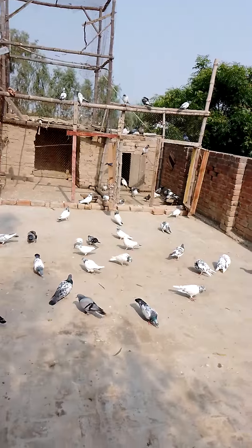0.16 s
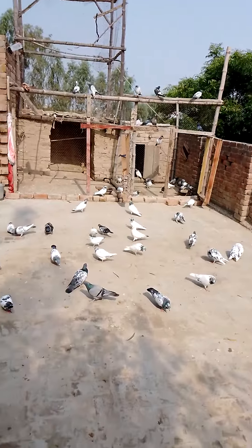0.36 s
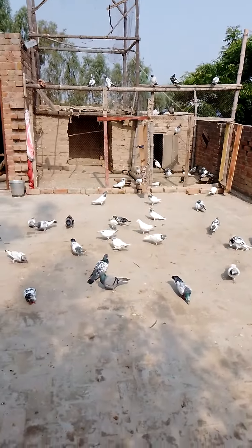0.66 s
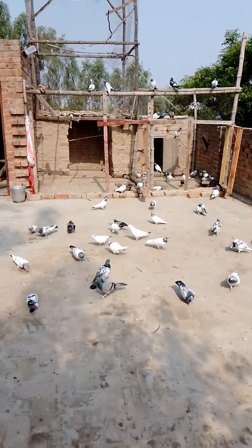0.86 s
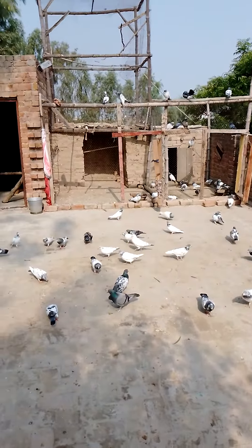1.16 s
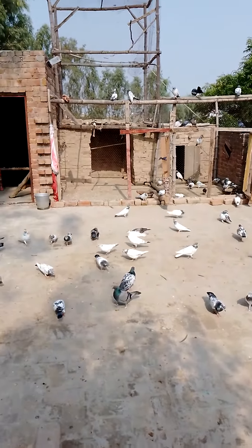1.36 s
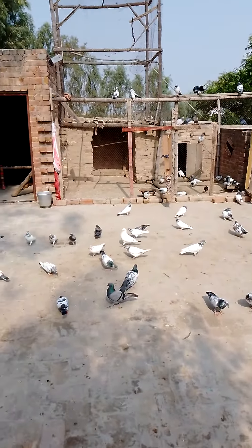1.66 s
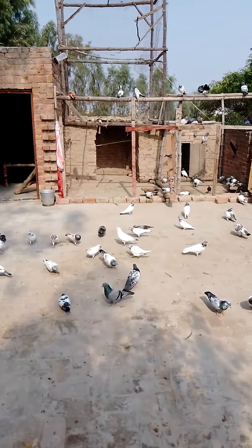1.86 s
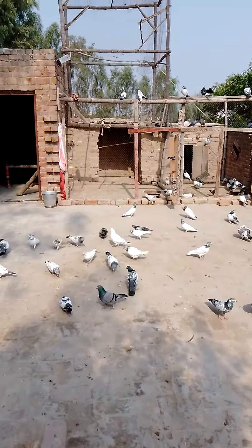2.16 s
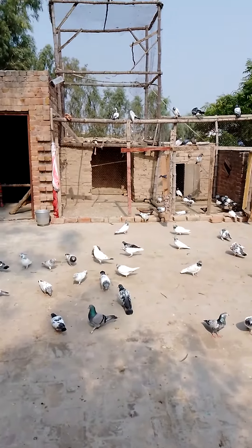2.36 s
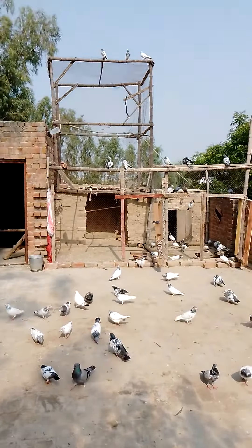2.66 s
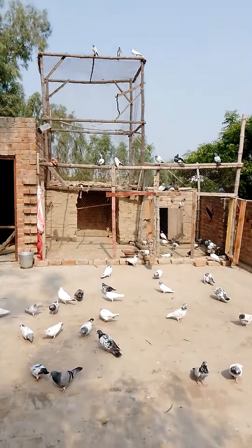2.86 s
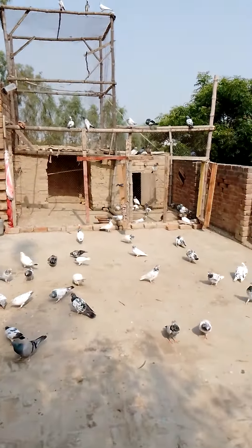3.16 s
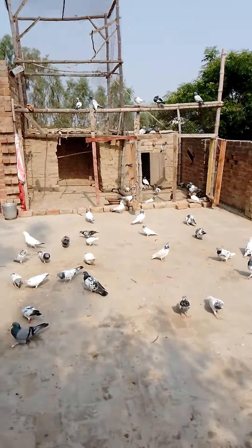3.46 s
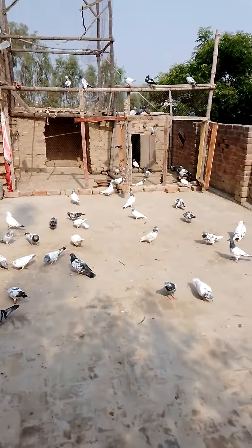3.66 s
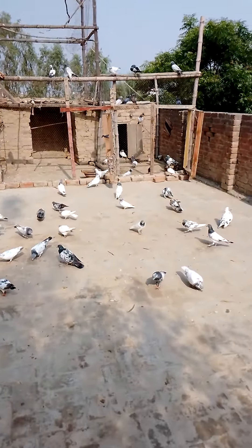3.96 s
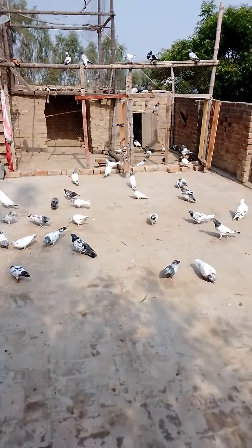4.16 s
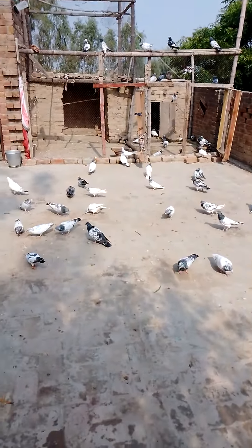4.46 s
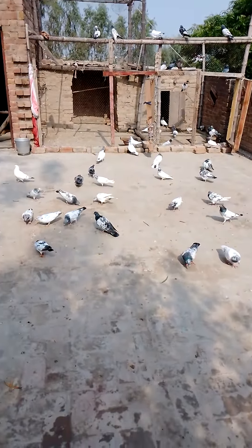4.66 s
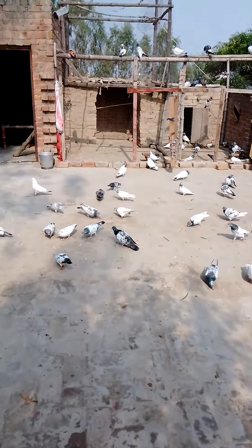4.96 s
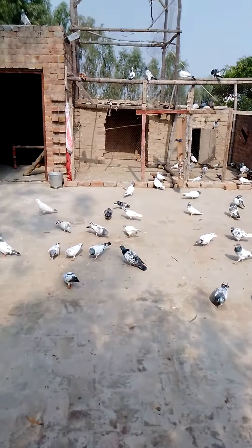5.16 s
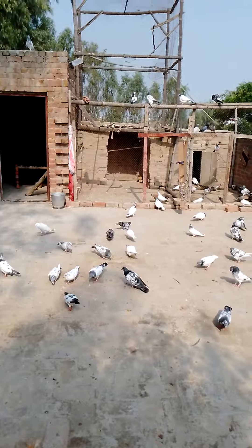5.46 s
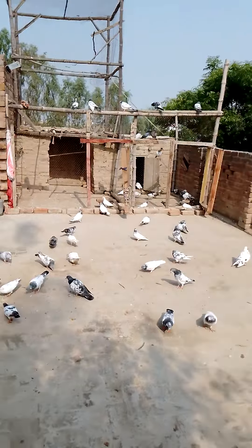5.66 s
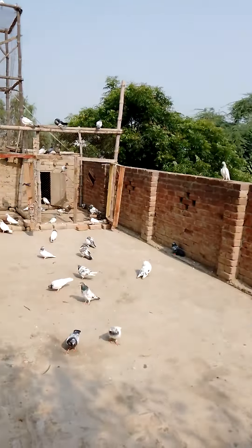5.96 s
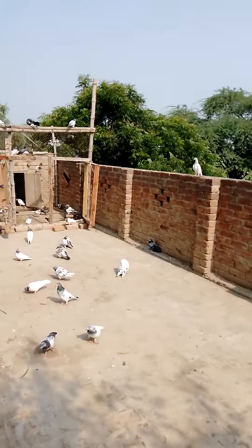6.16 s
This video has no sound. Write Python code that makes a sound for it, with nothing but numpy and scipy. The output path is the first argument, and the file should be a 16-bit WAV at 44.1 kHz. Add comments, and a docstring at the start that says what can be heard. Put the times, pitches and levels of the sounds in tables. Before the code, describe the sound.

Pigeons coo and roll in throaty, throbbing voices in a brick-walled yard, with early wing claps and hoarse crow caws at two and five seconds.

```python
"""A flock of pigeons on an open, brick-walled rooftop, over a faint outdoor rumble.
From the start pigeons coo, throbbing sines with gaps, amid gliding tones: single moans, and faint upper tones
that sound along with coos and a far caw. Noise bursts clap one bird's wings.
Crows in the trees soon caw through two throat resonances, and a small bird whistles short pips.
From two seconds a near crow caws, and caws again at five: harmonics broken by a lower tone.
Noise scuffs the floor from three seconds on, and the coos and gliding tones last to the end."""
import sys
import numpy as np
from scipy import signal
from scipy.fft import rfft, irfft, next_fast_len
from scipy.io import wavfile
from scipy.ndimage import uniform_filter1d, map_coordinates

SR = 44100
rng = np.random.default_rng(int(sys.argv[2]) if len(sys.argv) > 2 else 0)


def materialize(psi):
    """Save the field psi as 16-bit PCM at rate SR to the path in sys.argv[1].

    A 1-D psi becomes a single channel; in a 2-D psi each row is a channel.
    """
    bounded = np.clip(np.atleast_2d(psi).T, -1, 1)
    quanta = np.round(bounded * 32767).astype(np.int16)
    wavfile.write(sys.argv[1], SR, quanta)


N = 277830
T = np.arange(N) / SR


def from_db(db):
    """Decibels to gain."""
    return 10 ** (np.asarray(db) / 20)


def rms_one(x):
    """Scale to unit power."""
    return x / np.sqrt(np.mean(x ** 2) + 1e-20)


def even(x, size=1500):
    """Hold the short-term power at 1."""
    return x / np.sqrt(np.abs(uniform_filter1d(x * x, size=size)) + 1e-6)


def curve(rows, axis=1, t=T):
    """One column of a table, joined by straight lines in time."""
    rows = np.array(rows)
    return np.interp(t, rows[:, 0], rows[:, axis])


def drift(rate):
    """Smooth random curve of spread 1 that changes about rate times a second."""
    knots = rng.standard_normal(8192)
    return rms_one(map_coordinates(knots, [T * rate], order=2, mode="wrap"))


def turn(hz):
    """Running phase of a frequency curve."""
    return 2 * np.pi * np.cumsum(hz) / SR


def band(x, low_hz, high_hz, order=2):
    """Butterworth band-pass."""
    sos = signal.butter(order, [low_hz, high_hz], "band", fs=SR, output="sos")
    return signal.sosfilt(sos, x + 1e-18)


def gain_at(points, hz):
    """Gain of a (Hz, dB) spectrum on a log-frequency axis."""
    points = np.array(points)
    return from_db(np.interp(np.log(hz + 1), np.log(points[:, 0]), points[:, 1]))


def coloured(x, colour):
    """Pass a sound through a (Hz, dB) spectrum."""
    size = next_fast_len(N)
    hz = np.arange(size // 2 + 1) * SR / size
    return irfft(rfft(x, size) * gain_at(colour, hz), size)[:N]


def noise(colour):
    """Unit noise with the given spectrum."""
    return rms_one(coloured(rng.standard_normal(N), colour))


def blip(at, width):
    """A brief bell-shaped rise and fall."""
    return np.exp(-.5 * np.minimum(((T - at) / width) ** 2, 100))


def bursts(rows):
    """Envelope of soft contacts that build within a millisecond and die away exponentially."""
    out = np.zeros(N)
    for at, level_db, decay in rows:
        on = (T >= at) & (T < at + 10 * decay)
        age = T[on] - at
        rise = np.sin(np.pi / 2 * np.minimum(age / .0007, 1)) ** 2
        out[on] += from_db(level_db) * rise * np.exp(-age / decay)
    return out


def swell(start, loudest, let_go, power, sag_db_per_s, release_db_per_s):
    """Effort that grows towards 1, sags after its loudest time and dies away once let go."""
    rise = np.clip((T - start) / (loudest - start), 0, 1) ** power
    sag_db = sag_db_per_s * np.maximum(T - loudest, 0)
    release_db = release_db_per_s * np.maximum(T - let_go, 0)
    return rise * from_db(-sag_db - release_db)


def outdoor_air():
    """A steady, faint outdoor rumble: noise weighted to the lows."""
    # Spectrum of the open air. Each row: frequency in Hz, relative level in dB.
    air_colour = [(20, -17), (48, -16), (65, -1.5), (85, -10.5), (130, -12), (165, -23), (260, -9.5),
                  (450, -9.5), (600, -17.5), (950, -22), (1800, -27), (2800, -21.5), (5900, -37),
                  (15500, -43)]
    return from_db(-67) * noise(air_colour)


def coo_effort(start, loudest, let_go):
    """The push behind one coo: it swells, sags slowly, then dies away."""
    return swell(start, loudest, let_go, power=1.35, sag_db_per_s=22, release_db_per_s=127)


def pigeon(pitch, rough, throb_hz, bend, jitter, overtone_db):
    """A near-sine from the closed beak; an uneven flutter of the syrinx cuts brief gaps in it and bends its pitch."""
    flutter = turn(throb_hz * np.exp(.27 * drift(60)))
    phase = turn(pitch * (1 + rough * (bend * np.sin(flutter) + jitter * drift(170))))
    gaps = ((1 - np.cos(flutter)) / 2) ** 2
    pulses = (1 - 1.14 * rough * gaps) * from_db(3.9 * rough * drift(80))
    return even(pulses * (np.sin(phase) + from_db(overtone_db) * np.sin(2 * phase)))


def back_pigeons():
    """Two higher voices overlap, rising in pitch as they push harder."""
    # Coos at the back. Each row: start, loudest and let-go times in seconds, level in dB.
    back_rows = [(-.1, 0.0, 0.034, -51.5), (0.08, 0.153, 0.37, -46.5), (.79, 0.866, .92, -61),
                 (0.956, 1.412, 1.5, -43.5), (1.551, 1.713, 1.73, -47), (1.972, 2.07, 1.84, -71.5),
                 (2.237, 2.379, 3.1, -52), (2.445, 2.86, 3.28, -45.5), (3.83, 3.88, 4.03, -67.5),
                 (4.03, 4.09, 4.37, -64.5), (4.4, 4.573, 4.87, -49.5), (4.981, 5.134, 5.3, -57.5),
                 (5.243, 5.761, 6.1, -45)]
    power = sum((from_db(level_db) * coo_effort(*times)) ** 2 for *times, level_db in back_rows)
    level = np.sqrt(power)
    pitch = 462.4 + 24.9 * level / level.max()   # Hz
    voices = np.zeros(N)
    for bird in range(2):
        own_pitch = pitch * np.exp(.07 * drift(12))
        voices += pigeon(own_pitch, .75, throb_hz=59.04, bend=0.063, jitter=0.0612, overtone_db=-26)
    return from_db(1.7 * drift(25)) * level * even(band(voices, 369, 598, order=3))


def gliding_tones():
    """Single moans, and faint upper tones along with coos and a far caw, swell, glide and fade; rough ones tremble."""
    # Gliding tones. Each row: start and length in seconds, first and last pitch in Hz, level in dB,
    # roughness 0-1, share of the tone spent swelling (held within .02-.98).
    glide_rows = [(-.05, 0.14, 302, 286.4, -43, 0.18, .4), (.088, 0.1, 579, 505, -47, 0.1, .2),
                  (.1, .14, 479, 388.6, -45, 0.36, 0.33), (0.217, 0.17, 650, 595.5, -52.5, 0.4, .4),
                  (1.451, 0.21, 655, 605.6, -55, 0.4, 0.49), (1.641, 0.065, 601, 530, -44.5, 0.01, .6),
                  (1.7, 0.076, 467, 501, -41, 0.19, 0.21), (2.0, .14, 468, 496, -68.5, .2, .6),
                  (3.431, 0.085, 336.5, 294, -53, 0.54, 0.086), (3.55, .11, 410, 390, -47, 0.47, 0.078),
                  (3.703, 0.061, 408, 275, -47.5, 0.4, 0.092), (3.76, 0.094, 318, 267, -55, 0.3, 0.15),
                  (4.221, 0.24, 433.4, 456.4, -53.5, .25, 0.67), (4.39, 0.072, 478.6, 496, -43.5, 0, 0.93),
                  (4.47, 0.087, 494, 482, -44, .15, 0.21), (4.558, 0.065, 424.7, 372, -40.5, 0.19, 0.18),
                  (4.568, 0.28, 321.8, 239.5, -47, 0.1, 0.097), (4.569, 0.06, 615, 598, -55.5, 0, .45),
                  (4.66, 0.12, 575, 472, -45, 0.18, 0.94), (4.786, 0.1012, 458, 329, -43.5, 0.35, 0.47),
                  (4.851, .11, 564, 617, -50.5, .14, 0.34), (5.062, .13, 233, 254, -54, 0.44, 0.19),
                  (5.616, .22, 690, 765, -60, .6, 0.56), (5.89, .15, 790, 745, -58.5, .12, 0.29),
                  (5.802, .2, 469, 371, -42, .25, .2), (5.879, 0.16, 658, 633, -52, 0.15, .45),
                  (5.99, 0.17, 451.7, 488.6, -46.5, 0.15, 0.57), (6.13, 0.11, 473, 477, -41, 0.03, 0.55),
                  (6.235, 0.11, 493, 514, -45.5, 0, 0.37)]
    out, tremor = np.zeros(N), drift(140)
    flutter = np.sin(turn(62 * np.exp(0.47 * drift(60))))
    for start, length, first_hz, last_hz, level_db, rough, swelling in glide_rows:
        on = (T > start) & (T < start + length)
        age = (T[on] - start) / length
        glide = first_hz + (last_hz - first_hz) * age
        phase = turn(glide * (1 + 0.12 * rough * tremor[on]))
        shape = np.interp(age, [0, np.clip(swelling, .02, .98), 1], [0, 1, 0]) ** 0.74
        shape *= 1 + rough * flutter[on]
        tone = np.sin(phase) + rough * from_db(-17) * np.sin(2 * phase)
        out[on] += np.sqrt(2) * from_db(level_db) * shape * tone
    return out


def wings():
    """Wing tips crack together; between the claps the feathers rustle and sweep through the air."""
    # Wing claps and feather flicks. Each row: time in seconds, envelope peak in dB, decay in seconds.
    clap_rows = [(.036, -51.5, 0.021), (.092, -31, 0.0066), (0.111, -38.5, 0.011), (0.212, -43.5, 0.0085),
                 (0.232, -44.5, 0.011), (.334, -41.5, 0.0089), (0.359, -47.5, 0.0068), (.462, -53, 0.039),
                 (0.546, -49, 0.003), (.751, -45.5, 0.016), (0.8477, -38.5, 0.0037), (0.862, -39, 0.0057),
                 (0.9246, -42, 0.0032), (0.9411, -54.5, 0.0033), (1.004, -47.5, 0.0026)]
    # Spells of feather rustle. Each row: start, loudest and let-go times in seconds, level in dB.
    rustle_rows = [(-.2, .1, 0.4, -58.5), (0.432, .56, 0.62, -57), (.76, .87, 1.04, -62),
                   (1.148, 1.35, 1.42, -71)]
    # One hard sweep of the wings: start, loudest and let-go times in seconds.
    sweep_times = (0.746, 0.795, 0.807)
    # Spectra of clap, rustle and sweep. Each row: frequency in Hz, relative level in dB.
    clap_colour = [(500, -37), (900, -24), (1350, -1.5), (2100, -14), (2800, -5), (3600, 6.5), (4250, 3),
                   (5100, -17), (7000, -26.5), (9000, -40), (15000, -37)]
    rustle_colour = [(590, -28), (1000, -8), (1090, -15.5), (1530, 1), (1750, -12.5), (2470, -12.5),
                     (2770, -5), (3710, 3), (4240, -6), (5860, -31.5), (12000, -40.5), (15600, -84),
                     (22000, -120)]
    sweep_colour = [(410, -64), (700, -24.5), (1250, -30.5), (1530, -2), (1980, -7.5), (2520, -1.5),
                    (3390, 1), (5170, -19), (5960, -19), (7130, -24.5), (8110, -42), (15000, -43.5)]
    barbs = from_db(2.5 * drift(500))   # feathers catch on each other
    flight = sum(from_db(level_db) * swell(*times, power=0.88, sag_db_per_s=3, release_db_per_s=109)
                 for *times, level_db in rustle_rows)
    rustle = from_db(1.2 * drift(54.1)) * flight * noise(rustle_colour)
    push = swell(*sweep_times, power=1.1, sag_db_per_s=30, release_db_per_s=604)
    sweep = from_db(-38) * push * noise(sweep_colour)
    return bursts(clap_rows) * noise(clap_colour) + barbs * (rustle + sweep)


def near_pigeons():
    """Rolling coos and grunts, higher and clearer with effort; the inflated crop passes only a low band."""
    # Rolling coos. Each row: start, loudest and let-go times in seconds, level in dB,
    # pitch at full effort in Hz, roughness 0-1 before effort clears it.
    coo_rows = [(0.071, 0.21, 0.37, -35, 338.7, 0.76), (0.999, 1.5, 1.66, -34, 355.7, 0.76),
                (2.278, 2.653, 2.68, -35, 353.5, 0.68), (2.691, 2.831, 3.17, -38, 382, 0.92),
                (3.144, 3.252, 3.25, -47, 300, 0.92), (3.98, 4.102, 4.15, -61, 310, .85),
                (4.177, 4.308, 4.29, -50, 298, 0.9), (4.419, 4.628, 4.66, -43.5, 330, 0.37),
                (4.76, 4.93, 5.05, -49, 321, 0.74), (5.151, 5.507, 5.54, -42.5, 317.2, 0.95),
                (5.542, 5.678, 5.79, -34, 350.7, 0.86), (5.79, 5.87, 5.92, -35, 345, 0.87)]
    # Short grunts in the same voice. Each row: time in seconds, level in dB, pitch in Hz.
    grunt_rows = [(0.111, -43, 355.2), (.84, -59.5, 300), (1.147, -46, 339.8), (1.808, -47, 328),
                  (1.867, -54, 322.6), (2.458, -43.5, 338.3), (3.15, -42, 387), (5.059, -54.5, 402),
                  (5.145, -44.5, 359), (5.2, -55, 398.8), (5.305, -46.5, 285), (6.02, -42.5, 324.2),
                  (6.197, -51, 396)]
    # Times in seconds when the voice catches briefly.
    catch_times = [.145, .3, 1.19, 1.24, 1.31, 1.782, 2.548, 4.695, 5.04, 5.375, 5.47, 5.565, 5.808]
    pitch_drop, clearing = .13, .2   # share of pitch lost without effort, of roughness lost at full effort
    notes = [(from_db(level_db) * blip(at, .015), hz, 0.819) for at, level_db, hz in grunt_rows]
    for start, loudest, let_go, level_db, hz, roughness in coo_rows:
        effort = coo_effort(start, loudest, let_go)
        note_hz = hz * (1 - pitch_drop * (1 - effort))
        note_rough = roughness * (1 - clearing * effort ** 4)
        notes.append((from_db(level_db) * effort, note_hz, note_rough))
    power = sum(gain ** 2 for gain, _, _ in notes)
    # the loudest note leads
    pitch = sum(gain ** 2 * hz for gain, hz, _ in notes) / power
    rough = np.clip(sum(gain ** 2 * roughness for gain, _, roughness in notes) / power, 0, 1)
    voice = pigeon(pitch, rough, throb_hz=62.95, bend=0.1, jitter=0.097, overtone_db=-23.5)
    voice = even(band(voice, 236.7, 644, order=6)) * from_db(1.3 * drift(32))
    catch_db = -9 * sum(blip(at, 0.011) for at in catch_times)
    return voice * np.sqrt(power) * from_db(catch_db)


def far_crows():
    """Distance leaves a faint fundamental and two throat resonances of each hoarse, pulsing caw."""
    # Crows in the trees. Each row: start and length in seconds, first and last pitch in Hz, rasps per second,
    # level in dB, share of the call spent swelling, upper throat resonance in Hz, its dB over the lower one.
    far_rows = [(0.3, 0.65, 790.6, 798, 63, -59.5, 0.74, 3630, -13),
                (0.554, 0.23, 788, 795.7, 97, -56.5, 0.22, 2662, 7),
                (1.111, 0.35, 501, 595, 91, -55, 0.74, 3420, -20),
                (1.634, 0.26, 564.4, 585, 78, -60, 0.32, 2400, 6.5),
                (4.623, 0.19, 614, 580, 75, -66, 0.045, 2697, 12),
                (4.696, 0.35, 522, 570, 66, -61, 0.49, 2720, -17.5),
                (5.819, 0.245, 870, 793.7, 92, -48.5, 0.05, 2463, 3),
                (6.06, 0.28, 734, 653.6, 72, -70.5, 0.54, 2080, 5.5)]
    throat_hz, width_hz = 1618, 322   # lower resonance, width of every resonance
    overtone_db = -30   # a faint band an octave over the upper resonance
    out, jitter, hiss = np.zeros(N), drift(600), rng.standard_normal(N)
    for start, length, first_hz, last_hz, rasp_hz, level_db, swelling, upper_hz, upper_db in far_rows:
        on = (T >= start) & (T < start + length)
        age = (T[on] - start) / length
        flutter = 2 * np.pi * rasp_hz * T[on]
        glide = first_hz + (last_hz - first_hz) * age
        phase = turn(glide * (1 + 0.061 * np.sin(flutter) + 0.025 * jitter[on]))
        source = sum(np.sin(k * phase) for k in range(2, 8)) + 3 * hiss[on]
        source = source * (1 + 0.6 * np.cos(flutter))
        lower, upper, top = (rms_one(band(source, hz - width_hz / 2, hz + width_hz / 2))
                             for hz in (throat_hz, upper_hz, 2 * upper_hz))
        cry = rms_one(lower + from_db(upper_db) * (upper + from_db(overtone_db) * top))
        cry = cry + from_db(-11.5) * np.sin(phase)
        rise, fall = age / swelling, (1 - age) / max(1 - swelling, .05)
        shape = np.maximum(np.minimum(rise, fall), 0) ** 0.68
        out[on] += from_db(level_db) * shape * cry
    return out


def small_bird():
    """Short, slightly falling whistles: bell-shaped sine pips."""
    # Pips. Each row: time in seconds, level in dB before a common lift of 1.5 dB.
    pip_rows = [(1.779, -60.5), (1.839, -60), (1.918, -60.5), (2.025, -65), (2.57, -65), (2.655, -71),
                (2.877, -66), (2.945, -63), (2.999, -66), (3.066, -66)]
    pip_hz, pip_s = 2790, 0.013   # centre pitch, spread of the bell
    out, waver = np.zeros(N), drift(230)
    for at, level_db in pip_rows:
        on = np.abs(T - at) < 3 * pip_s
        age = (T[on] - at) / pip_s
        whistle = np.sin(turn(pip_hz * (1 - .01 * age + 0.01 * waver[on])))
        out[on] += from_db(level_db + 1.5) * np.exp(-.5 * age ** 2) * whistle
    return out


def caw(start, length, level_db, hoarseness):
    """Pitch, rasp and effort of one caw: as the air runs out it weakens and droops, with a last push."""
    # A soft, clear hiccup before the full rasp. Each row: seconds since the start,
    # pitch in Hz before droop and wander, level in dB relative to the caw, rasp 0-1 before added hoarseness.
    opening = [(0, 435, -19, .4), (.016, 515.3, -11.5, 0.2), (.031, 552, -12, .3), (.048, 508, -7, .5),
               (.072, 574.4, 0, .72), (.13, 590, 1, .88)]
    age = T - start
    droop = 0.16 * np.clip(age / length, 0, 1) ** 4.6
    pitch = curve(opening, t=age) * (1 - droop + .008 * drift(20))
    rasp = np.clip(curve(opening, axis=3, t=age) + hoarseness, 0, 1)
    kick_s = 0.0067
    kick_db = 3 * blip(start + length - kick_s, kick_s)
    held = swell(start, start + 0.0074, start + length, power=1, sag_db_per_s=15.5, release_db_per_s=900)
    return pitch, rasp, from_db(level_db + curve(opening, axis=2, t=age) + kick_db) * held


def near_crow():
    """A nasal harmonic cry that breaks briefly into a lower tone some 66 times a second: the rasp."""
    # Caws. Each row: start and length in seconds, level in dB, rasp added 0-1.
    caw_rows = [(2.072, .402, -38, 0), (5.211, .452, -39, 0.3)]
    # Harmonics of the clear voice. Each row: multiple of the pitch, level in dB before the focus scales it.
    clear_voice = [(2, -10.5), (3, -2.5), (4, -6), (5, -11), (6, -16), (7, -18.5), (9, -22.5), (10, -16)]
    # The throat's response. Each row: frequency in Hz, gain in dB.
    throat = [(600, -40), (900, -18), (1200, -7.5), (1500, 1.5), (1780, 4.5), (2100, 4.5), (2400, -4),
              (2800, -6.5), (3300, -6.5), (3780, 5), (4150, -29), (4700, -29.5), (6300, -41.5),
              (8000, -48.5)]
    rasp_hz = 66
    source, effort = np.zeros(N), np.zeros(N)
    flutter = turn(rasp_hz * (1 + .05 * drift(70)))
    jitter, hiss = drift(700), rng.standard_normal(N)
    for row in caw_rows:
        pitch, rasp, gain = caw(*row)
        effort += gain
        on = gain > 1e-6
        pitch, rasp, cycle = pitch[on], rasp[on], flutter[on]
        broken = rasp * (.5 + .5 * np.cos(cycle)) ** 3
        phase = turn(pitch * (1 + 0.01 * jitter[on] + .015 * rasp * np.sin(cycle)))
        focus = 0.46 + 0.35 * rasp   # at full force the third harmonic takes over
        clear = sum(from_db(db * focus) * np.sin(round(k) * phase) for k, db in clear_voice)
        clear = clear * (1 - broken) * (1 - 0.14 * rasp * np.sin(cycle))
        # the lower tone starts afresh in every break
        low_phase = (np.mod(cycle + np.pi, 2 * np.pi) - np.pi) * pitch * 2.208 / rasp_hz
        low = np.sin(low_phase) + from_db(-5.5) * np.sin(2 * low_phase) + from_db(-19.5) * np.sin(3 * low_phase)
        breath = from_db(-2.5) * (0.41 + broken) * hiss[on]
        source[on] = clear + from_db(0.5) * broken * low + breath
    # the beak opens with effort and lets the upper resonance out
    gape = np.clip(effort / from_db(-42.5), 0, 1)
    cry = coloured(source, throat)
    muffled = coloured(cry, [(2450, 6.0), (2900, -18.5)])
    return even(gape * cry + (1 - gape) * muffled) * effort


def floor_scuffs():
    """Light scuffs on the dusty floor: short bursts of dull noise."""
    # Scuffs. Each row: time in seconds, envelope peak in dB, decay in seconds.
    scuff_rows = [(3.25, -65.5, 0.043), (3.515, -62.5, 0.0025), (3.594, -57.5, 0.02), (3.989, -64.5, .012),
                  (4.285, -64, 0.016), (4.411, -68.5, 0.016), (4.63, -58, 0.048), (6.152, -65, 0.018)]
    # Spectrum of a scuff. Each row: frequency in Hz, relative level in dB.
    scuff_colour = [(400, -3), (1200, -3.5), (2300, 1.5), (4000, 1.5), (5500, -17.5), (8000, -31)]
    return bursts(scuff_rows) * noise(scuff_colour)


def yard(x, wet_db):
    """Scattered echoes from brick walls and trees, dull and dying quickly."""
    age = T[:SR]
    fade = from_db(-60 * age / 0.5)   # 60 dB down in half a second
    echoes = rng.standard_normal(SR) * (rng.random(SR) < .03) * (age > .008) * fade
    echoes = band(echoes / np.sqrt(np.sum(echoes ** 2)), 150, 4700, order=1)
    return x + from_db(wet_db) * signal.fftconvolve(x, echoes)[:N]


def scene():
    """All the birds in the yard, over the outdoor background."""
    tonal = back_pigeons() + gliding_tones() + near_pigeons()
    # mostly sung through a closed beak, so without treble
    flock = yard(band(tonal, 192, 1100, order=4), wet_db=-10.5)
    contacts = yard(wings() + floor_scuffs(), wet_db=-8.0)
    neighbours = yard(far_crows() + small_bird(), wet_db=-5) + yard(near_crow(), wet_db=-4.5)
    return (outdoor_air() + flock + contacts + neighbours)[None]


def record(dry):
    """The top is cut steeply above 15750 Hz by an elliptic low-pass."""
    return signal.sosfilt(signal.ellip(10, .1, 70, 15750, fs=SR, output="sos"), dry)


dry = scene()
out = record(dry)
materialize(out)
```